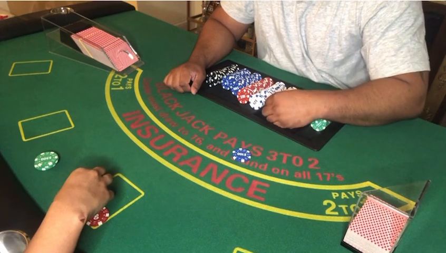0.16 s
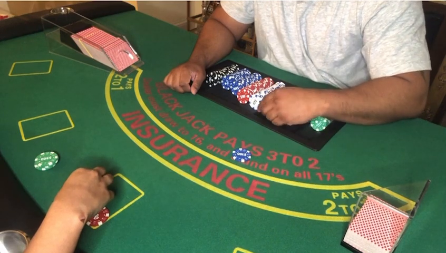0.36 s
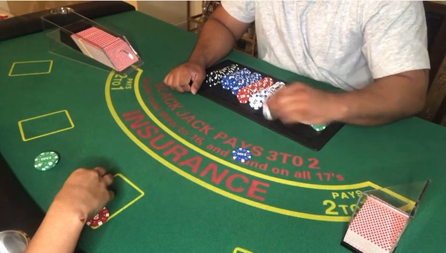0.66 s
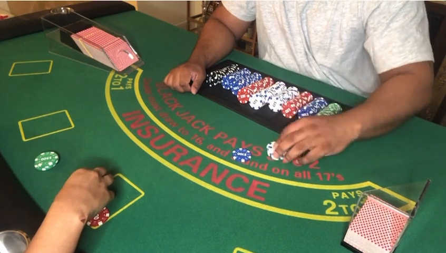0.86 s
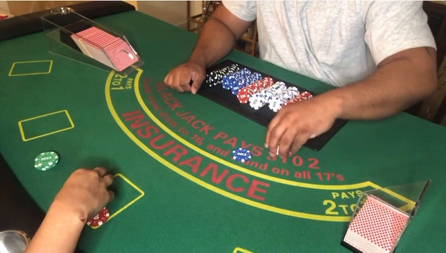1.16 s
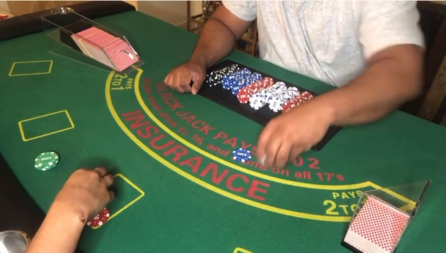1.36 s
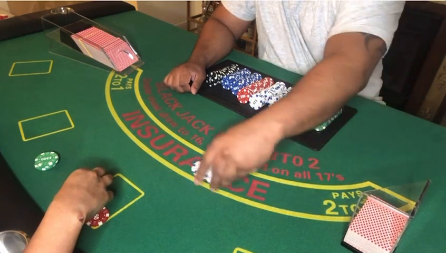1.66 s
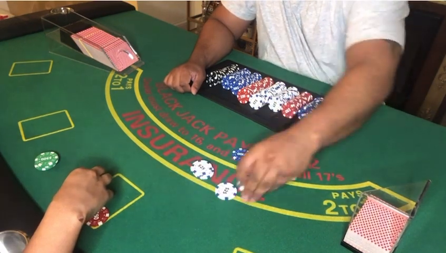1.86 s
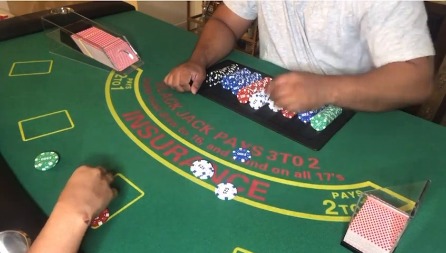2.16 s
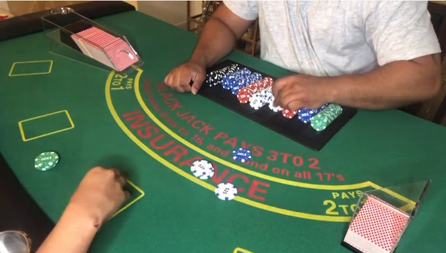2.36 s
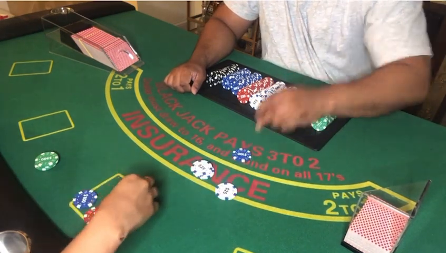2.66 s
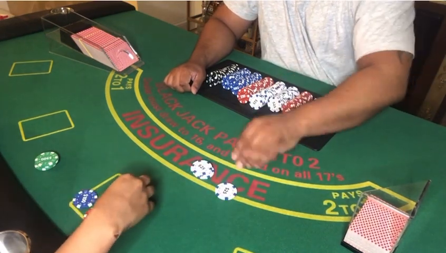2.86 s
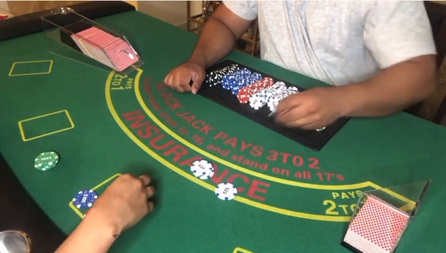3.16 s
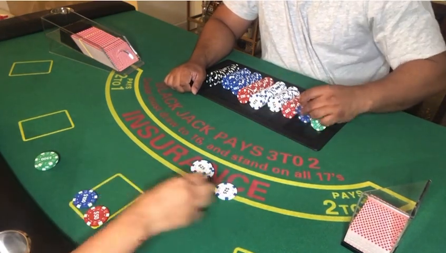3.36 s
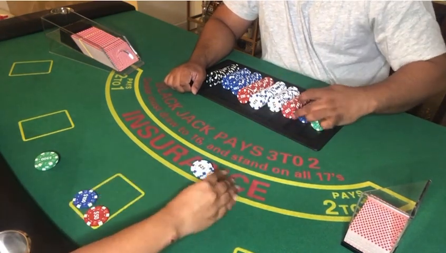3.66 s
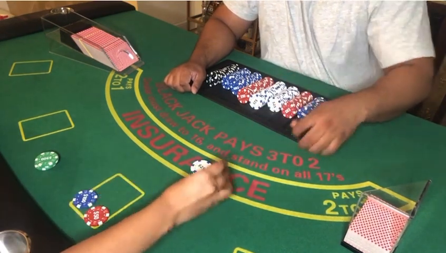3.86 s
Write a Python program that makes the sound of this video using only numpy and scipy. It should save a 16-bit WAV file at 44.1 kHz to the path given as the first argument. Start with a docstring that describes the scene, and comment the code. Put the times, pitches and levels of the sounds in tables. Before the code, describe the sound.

Plastic gambling chips click and clink sharply on a felt table in a quiet living room

```python
"""Loose plastic chips, struck together at a felt table in a quiet living room, crack and ring in their modes.
Stacked chips clack dully as short noise bursts; a plastic tray knocks as a sum of dying modes, and
fingertips tap it softly. The table top thuds in low modes, and hands slide over the cloth as lumpy noise.
The room adds a short tail to chips and tray, over a soft hum and a faint high whine."""
import sys
import numpy as np
from scipy import signal
from scipy.fft import rfft, irfft
from scipy.io import wavfile
from scipy.ndimage import uniform_filter1d

SR = 44100
rng = np.random.default_rng(int(sys.argv[2]) if len(sys.argv) > 2 else 0)


def wrap_up_sound(samples):
    """Save the sound to the file named by the first command line argument, as 16-bit audio."""
    columns = np.atleast_2d(samples).T
    # keep every value between -1 and 1, then stretch to whole-number steps
    tamed = np.clip(columns, -1, 1)
    steps = np.round(tamed * 32767).astype(np.int16)
    wavfile.write(sys.argv[1], SR, steps)


def gain_from_db(level_db):
    """Turn a decibel level (scalar or array-like) into a linear amplitude factor."""
    decades = np.asarray(level_db, float) / 20
    return 10 ** decades


N = 176400


def evened(x):
    """Normalisation: scales a signal to an rms of 1."""
    return x / np.sqrt(np.mean(x ** 2) + 1e-20)


def read(points, hz):
    """Interpolation on a log-frequency axis, on which hearing judges pitch."""
    f, value = np.transpose(points)
    return np.interp(np.log(hz + 1), np.log(f + 1), value)


def add(mix, s, peak_db, sound):
    """Superposition: adds a sound to the mix at its time and peak level."""
    part = mix[max(round(s * SR), 0):][:len(sound)]
    part += (gain_from_db(peak_db) * sound / np.abs(sound).max())[:len(part)]


def ring(hz, db, t60, length):
    """Modal synthesis: a struck body sounds as a sum of exponentially dying sines."""
    t = np.arange(0, length, 1 / SR)[:, None]
    level = gain_from_db(db - 60 * t / np.maximum(t60, 1e-3))
    return (level * np.sin(2 * np.pi * hz * t)).sum(1), t[:, 0]


def crack(noise, length, tilt_db, bump_hz=5000.):
    """Impact: a first contact, then a dying rattle of noise, in the colour of clashing plastic."""
    # Spectrum of clashing plastic. Each row: frequency in Hz, level in dB.
    plastic_colour = [(470, -40), (800, -6.5), (3340, -5), (5290, 1), (7660, -4), (11400, -7),
                      (12800, -12.5), (14100, -3.5), (16100, -19.5), (16900, -39.5)]
    bump_db, bump_octaves = 6, 0.56
    t = np.arange(len(noise)) / SR - .002
    hz = np.fft.rfftfreq(len(noise), 1 / SR)
    burst = noise * np.clip(t / 0.00009, 0, 1) * np.exp(-t / max(length, 2e-4))
    burst[94] = 2.01  # the first contact, against rattle noise of rms 1 before its decay
    bump = bump_db * np.exp(-(np.log2((hz + 1) / bump_hz) / bump_octaves) ** 2)
    tilt = tilt_db * np.log2(hz / 6000 + 0.46)
    burst = irfft(rfft(burst) * gain_from_db(read(plastic_colour, hz) + bump + tilt))
    burst = burst[74:]  # most of the silent lead is dropped
    burst = burst * np.minimum(np.arange(len(burst)) / 12, 1)
    return burst / np.abs(burst).max()


def shaped(db):
    """Short-time synthesis: random spectra weighted by db(hz, t) overlap into coloured noise."""
    frames = N // 128 + 5
    hz = np.fft.rfftfreq(512, 1 / SR)[:, None]
    a, b = rng.standard_normal((frames, 257, 2)).T
    spectra = (a + 1j * b) * gain_from_db(db(hz, np.arange(frames) * 128 / SR))
    return signal.istft(spectra, nperseg=512, noverlap=384)[1][:N]


def hush():
    """Room tone and hum: coloured noise, patchy in time and pitch, plus narrow-band noise tones."""
    # Spectrum of the room tone. Each row: frequency in Hz, relative level in dB per Hz.
    hush_colour = [(12, -54), (20, -17.5), (82, -3), (432, -10.5), (557, -15.5), (804, -16.5), (1300, -21),
                   (1410, -22), (2350, -32.5), (4620, -29.5), (13900, -39.5), (16900, -45)]
    # Fuzzy hum tones. Each row: frequency in Hz, width in Hz of each of two equal poles, rms level in dB.
    hum_tones = [(54.5, 30, -61), (146, 15, -70.5)]
    hush_db, patch_db = -62, 2
    frames, hz = N // 512 + 5, np.fft.rfftfreq(2048, 1 / SR)
    a, b, patch = rng.standard_normal((frames, 1025, 3)).T
    patch = uniform_filter1d(patch, size=16, axis=0)
    patch = evened(uniform_filter1d(patch, size=4, axis=1))
    spectra = (a + 1j * b) * gain_from_db(read(hush_colour, hz)[:, None] + patch_db * patch)
    out = gain_from_db(hush_db) * evened(signal.istft(spectra, nperseg=2048, noverlap=1536)[1][:N])
    for f_hz, width_hz, db in hum_tones:
        # slow complex noise carried up to the tone's frequency
        r = np.exp(-np.pi * width_hz / SR)
        slow = signal.lfilter([1], [1, -2 * r, r * r], rng.standard_normal((N, 2)) @ [1, 1j])
        out += gain_from_db(db) * evened((slow * np.exp(2j * np.pi * f_hz * np.arange(N) / SR)).real)
    return out


def whine():
    """Frequency modulation: a thin high sine whose pitch wavers slightly at random."""
    whine_hz, whine_db, waver_rms_hz = 4480, -77.5, 14
    waver = evened(uniform_filter1d(rng.standard_normal(N), size=2000))
    return gain_from_db(whine_db) * np.sin(2 * np.pi * np.cumsum(whine_hz + waver_rms_hz * waver) / SR)


def room(x):
    """Reverberation: first reflections, then three sparse tails fed in turn, bands dying at their own speed."""
    # Reverberation time. Each row: frequency in Hz, t60 in seconds.
    room_t60 = [(100, 0.36), (300, 0.31), (1000, 0.4), (3000, 0.49), (6000, 0.43), (10000, 0.34),
                (16000, 0.17)]
    # Colour of the tail at its start. Each row: frequency in Hz, relative level in dB.
    room_colour = [(100, 9), (1000, -0.6), (6000, -6.5), (16000, -6)]
    # First reflections. Each row: delay in seconds, level in dB.
    echoes = [(.0088, -15), (.0147, -18)]
    room_db, room_gap_s, room_rise_s, turn_hz = -7, 0.0027, 0.0065, 37
    out, t = np.zeros(N), np.arange(N) / SR
    for k in range(3):
        # one spike of random sign at a random place in every 12 samples
        spikes = np.zeros(SR)
        at = np.arange(100, SR - 12, 12) + rng.integers(0, 12, (SR - 101) // 12)
        spikes[at] = rng.choice([-1., 1.], len(at))
        hz, tt, z = signal.stft(spikes, SR, nperseg=512)
        z = z * gain_from_db(read(room_colour, hz)[:, None] - 60 * tt / read(room_t60, hz)[:, None])
        tail = signal.istft(z, SR, nperseg=512)[1][:SR]
        tail = tail * np.clip((t[:SR] - room_gap_s) / room_rise_s, 0, 1)
        # the three feeds are a sixth of a cycle apart, so their squares sum to 1
        turn = np.cos(2 * np.pi * (turn_hz * t + k / 6)) * np.sqrt(2 / 3)
        out += gain_from_db(room_db) * signal.fftconvolve(x * turn, tail / np.linalg.norm(tail))[:N]
    for s, db in echoes:
        delay = round(s * SR)
        out[delay:] += gain_from_db(db) * x[:-delay]
    return out


def slides():
    """Friction: hands and chips rub the felt as lumpy noise with fibre ticks; body and treble swell apart."""
    # Five slides, each a list. Each row: time in seconds, body level in dB, treble level in dB.
    slide_curves = [
        [(0.0, -68.5, -103), (0.158, -66, -92), (0.216, -54, -76.5), (0.352, -68.5, -80), (0.36, -59.5, -91),
         (0.5, -63.5, -72.5), (0.7, -62, -63.5), (0.82, -60, -75)],
        [(0.85, -67, -88), (1.02, -61.5, -64.5), (1.045, -59, -62), (1.1, -72, -73), (1.122, -51.5, -63.5),
         (1.324, -81.5, -96), (1.48, -57.5, -58.5)],
        [(1.72, -57.5, -83), (1.784, -63, -73), (1.926, -63, -71.5), (1.948, -75, -92.5), (2.146, -86.5, -82),
         (2.168, -70.5, -106), (2.22, -82, -102)],
        [(2.66, -95.5, -102), (2.686, -76.5, -80.5), (2.776, -55.5, -62), (2.954, -56.5, -59.5),
         (3.04, -74, -78), (3.206, -89, -99), (3.29, -59, -63.5)],
        [(3.7, -55, -67), (3.728, -85, -75), (3.768, -63, -79.5), (3.792, -92, -79), (3.798, -71.5, -77),
         (3.916, -61.5, -68), (3.93, -61, -66)],
    ]
    # Spectrum of rubbed felt. Each row: frequency in Hz, relative level in dB per Hz.
    rub_colour = [(59, -41.5), (100, -32), (141, -13), (412, 5), (479, -2.5), (736, -3), (5900, -8),
                  (15200, -29.5), (16900, -49.5)]
    split_hz, fade_s = 2640, 0.06
    grain_db, lump_db = 2, 3.5  # flicker from frame to frame; uneven catching of the cloth
    fibres_per_s, fibre_db, fibre_spread_db = 500, -9, 3.5
    t, out = np.arange(N) / SR, np.zeros(N)

    def colour(hz, tt):
        """Stick and slip: the rub spectrum with random flicker, swells and patches."""
        swell = evened(uniform_filter1d(rng.standard_normal(len(tt)), size=8))
        patch = rng.standard_normal((len(tt), len(hz))).T
        patch = uniform_filter1d(patch, size=5, axis=0)
        patch = evened(uniform_filter1d(patch, size=10, axis=1))
        grain = grain_db * rng.standard_normal(len(tt))
        return read(rub_colour, hz) + grain + lump_db * (swell + patch) / 2

    rub = evened(shaped(colour))
    fibre_height = gain_from_db(fibre_spread_db * np.minimum(rng.exponential(1, N), 5))
    fibre_hit = rng.random(N) < fibres_per_s / SR
    fibres = fibre_height * fibre_hit * rng.choice([-1, 1], N)
    fibre_band = signal.butter(1, (1500, 7000), "band", fs=SR, output="sos")
    rub = rub + gain_from_db(fibre_db) * evened(signal.sosfilt(fibre_band, fibres))
    low = signal.sosfiltfilt(signal.butter(2, split_hz, fs=SR, output="sos"), rub)
    body, treble = evened(low), evened(rub - low)
    for rows in slide_curves:
        s, body_db, treble_db = np.transpose(rows)
        fade = np.clip(np.minimum(t - s[0], s[-1] - t) / fade_s + .5, 0, 1)
        out += fade * gain_from_db(np.interp(t, s, body_db)) * body
        out += fade * gain_from_db(np.interp(t, s, treble_db)) * treble
    return out


def table():
    """Dispersion: bending waves travel faster at high pitch, so each table-top thud glides down."""
    # Thuds. Each row: time in seconds, peak level in dB, extra level of the upper modes in dB.
    thuds = [(0.039, -45.5, 11), (0.213, -40.5, 9.5), (0.26, -46, 17), (0.368, -46.5, 42), (0.624, -52, 7),
             (0.715, -30, -4), (0.73, -35.5, -8), (0.75, -33, -4.5), (0.799, -42.5, -8), (0.824, -42, -15),
             (1.036, -49.5, -13), (1.129, -48, 8), (1.51, -33.5, -12.5), (1.675, -33.5, 2.5),
             (1.744, -36.5, -1), (1.868, -44.5, -8), (2.15, -49, 9), (2.905, -52.5, -12),
             (3.323, -46.5, 33), (3.37, -39, 3.5), (3.955, -32.5, -12)]
    # Modes of the table top. Each row: frequency in Hz, level in dB, t60 in seconds,
    # share (0 to 1) of the extra upper-mode level that the mode takes.
    table_modes = [(65, -10.5, 0.33, 0.3), (101.6, -0.5, 0.14, 0.13), (141.5, 0.5, 0.36, 0.17),
                   (182.5, -3.5, 0.12, 0.53), (212, -9.5, 0.13, 0.16), (252.6, -4, 0.13, 0.92),
                   (316.4, -3, 0.14, 1), (356, -3.5, 0.061, 1), (450, -6.5, 0.06, 0.83),
                   (563, -7, .035, 0.34), (710, -15, .025, .5)]
    rise_s, lag_s = .008, .012  # both at 100 Hz, shorter for higher modes
    out, (hz, db, t60, upper) = np.zeros(N), np.transpose(table_modes)
    slowness = np.sqrt(100 / hz)
    lag = lag_s * slowness
    t = np.arange(0, .5, 1 / SR)[:, None] - lag + lag.min()
    rise = np.clip(t / (rise_s * slowness), 0, 1)
    for (s, peak_db, upper_db), phase in zip(thuds, rng.random((len(thuds), len(hz)))):
        level = rise * gain_from_db(db + upper_db * upper - 60 * t / t60)
        tone = level * np.sin(2 * np.pi * (hz * t + phase))
        add(out, s - rise_s, peak_db, tone.sum(1))
    return out


def taps():
    """Soft excitation: fingertips on the tray wake only one hollow note and a weak overtone."""
    # Taps. Each row: start in seconds, peak level in dB, frequency in Hz, t60 in seconds.
    tap_rows = [(.214, -45, 823, 0.11), (0.233, -50, 906, 0.081), (.361, -37.5, 817, 0.018),
                (.378, -48, 815, 0.032), (.412, -44, 894, 0.026), (.965, -48.5, 795, 0.042),
                (1.123, -43, 548, 0.042), (1.134, -48.5, 910, 0.05), (1.662, -44.5, 905, 0.015),
                (1.863, -50.5, 592, 0.025), (2.761, -49.5, 1045, 0.0504), (3.372, -35, 813, 0.085),
                (2.298, -37.5, 310, 0.087), (2.93, -49, 900, 0.08), (2.861, -52, 490, 0.085),
                (.27, -46, 347, .05)]
    overtone_ratio, overtone_db, rise_s = 1.6, -11.5, .003
    out = np.zeros(N)
    for s, peak_db, hz, t60 in tap_rows:
        tone, t = ring(hz * np.array([1, overtone_ratio]), np.array([0, overtone_db]), t60, 0.15)
        add(out, s, peak_db, tone * np.minimum(t / rise_s, 1))
    return out


def tray():
    """Modal resonance: hollow plastic modes swell to aligned crests, then die; each knock has a small tick."""
    # Knocks. Each row: time in seconds, peak level in dB before the band filter, factor on the mode
    # frequencies, factor on the ring times, tilt in dB per octave.
    knocks = [(2.3003, -3.5, 1.002, 0.8, 2), (2.3424, -11, 1.04, 0.8, 0), (3.3551, -21.5, 1.17, 0.73, 3),
              (3.5243, -17, 1.02, 1.08, 3)]
    # Modes of the tray. Each row: frequency in Hz, level in dB, t60 in seconds.
    tray_modes = [(345.5, -17, 0.04), (680, -13, 0.021), (824, -1.5, 0.015), (1069, -3.5, 0.017),
                  (1330, -3.5, 0.011), (1564, -5.5, 0.01), (1815, -10, 0.008), (2406, -13, 0.0095),
                  (2900, -16, 0.006), (3520, -17.5, 0.0063)]
    rise_s, tick_db, tick_s, band_hz = 0.0022, -8.5, 0.00031, (260, 6000)
    lag_s = 0.000577  # modes crest this much later per octave down, relative to 1 kHz
    out, (hz, db, t60) = np.zeros(N), np.transpose(tray_modes)
    t = np.arange(-2 * rise_s, .15, 1 / SR)[:, None] + lag_s * np.log2(hz / 1000)
    swell = np.clip(1 + t / rise_s, 0, 1) ** 2
    for (s, peak_db, pitch, long, tilt_db), noise in zip(knocks, rng.standard_normal((len(knocks), 1024))):
        decay_db = 60 * np.maximum(t, 0) / (t60 * long)
        level = swell * gain_from_db(db + tilt_db * np.log2(hz / 800) - decay_db)
        tone = -(level * np.cos(2 * np.pi * hz * pitch * t)).sum(1)
        add(out, s - 2 * rise_s, peak_db, tone)
        # brighter knocks tick louder
        tick = crack(noise, tick_s, -9.0, 3800.)
        add(out, s - rise_s / 2, peak_db + tick_db + 2 * tilt_db, tick)
    return signal.sosfilt(signal.butter(2, band_hz, "band", fs=SR, output="sos"), out)


def stacked_chips():
    """Damping: chips in a stack clack as a short crack without ringing."""
    # Clacks. Each row: start in seconds, peak level in dB, rattle decay time in seconds (at least 0.2 ms
    # is used), tilt in dB per octave, centre of the spectral bump in Hz.
    clacks = [(0.199, -47.5, 0.002, -9, 4100), (0.418, -44, 0.0078, -19.5, 4130),
              (0.7088, -29, 0.0047, 0.5, 5760), (0.7103, -26.5, 0.0024, -6, 4660),
              (0.7262, -29.5, 0.0057, -9, 5000), (0.7448, -22, 0.00074, -2.5, 5030),
              (1.033, -28.5, 0.0011, -2.5, 4040), (1.53, -15.5, 0.00044, 5, 8100),
              (2.247, -19, 0.001, -7.5, 3330), (2.316, -25.5, 0.00075, -7, 8900),
              (2.317, -13.5, 0.0024, -7.5, 5370), (2.3357, -29.5, 0.0013, -0.5, 11000),
              (2.3384, -26, .0015, -3.5, 13900), (2.3406, -13.5, 0.00071, -14, 3050),
              (2.69, -55, .002, 4, 9870), (3.3192, -20.5, 0.0011, -10.5, 3020),
              (3.3645, -11, 0.0011, 21, 6000), (3.366, -6.5, 0.0012, 9.5, 5450),
              (3.3686, -8, 0.00035, -11.5, 10600), (3.9493, -6.5, 0.00051, 20, 10400)]
    out = np.zeros(N)
    for (s, peak_db, length, tilt_db, bump_hz), noise in zip(clacks, rng.standard_normal((len(clacks), 1024))):
        add(out, s, peak_db, crack(noise, length, tilt_db, bump_hz))
    return out


def loose_chips():
    """Free vibration: two loose chips crack together and both ring in slightly different modes."""
    # Clinks. Each row: start in seconds, peak level in dB, ring t60 in seconds, tilt in dB per octave,
    # crack level against the ring in dB, extra level of the main mode in dB.
    clinks = [(1.034, -28.5, 0.013, -17, 0, 3.5), (1.4955, -31.5, 0.1, -16, -0.5, 0.5),
              (1.5156, -10, 0.12, 3.5, -1.5, -8), (1.519, -16, 0.068, 24, 1.5, 5.5),
              (1.5277, -9, .035, 17, -7.5, 4.3), (1.530, -17.5, 0.027, 4, 0, -3),
              (1.916, -42, 0.036, 15, -8.5, 0), (3.3183, -30, 0.049, -9, 3.5, -1),
              (3.9275, -55, 0.022, 2, -19, 15), (3.932, -51, 0.023, 11, -7, 0.1),
              (3.9434, -12.5, 0.057, -8.5, 4, 10), (3.9499, -8, 0.0153, -2, -11, 26),
              (3.9537, -12.5, 0.023, -1, 11, 11), (3.956, -17.5, 0.054, -22, -10, 0),
              (3.9606, -16, 0.033, 2.5, 7, -3), (3.9634, -17, 0.038, 24, 3, -8),
              (3.967, -16.5, 0.07, 23, 3.5, 7)]
    # Modes of one chip, in order of pitch. Each row: level in dB, factor on the ring time.
    chip_modes = [(-6, 1.7), (4.5, 0.54), (-20.5, 1.3), (8, 2.7), (-17, .4), (2, 0.68), (1, .8),
                  (-18.5, 0.25), (-16, 0.4), (-14.5, 0.46), (-3.5, .9), (-3, .7), (-13, .6)]
    # Mode frequencies of one chip, in Hz, in the same order.
    chip_hz = [4100, 5650, 6000, 6500, 7900, 8520, 9150, 10600, 11300, 12300, 13650, 14750, 15400]
    detune, strike_db = .013, 2.5  # random spreads: share of frequency, mode level
    hz, (db, share) = np.array(chip_hz + chip_hz), np.transpose(chip_modes + chip_modes)
    out, k = np.zeros(N), len(hz)
    main = (hz > 6300) & (hz < 6900)
    draws = rng.standard_normal((len(clinks), 1024))
    for (s, peak_db, t60, tilt_db, crack_db, main_db), noise in zip(clinks, draws):
        mode_hz = hz * (1 + detune * noise[k:2 * k])
        mode_db = db + main_db * main + strike_db * noise[:k] + tilt_db * np.log2(hz / 6500)
        tone = ring(mode_hz, mode_db, t60 * share, .2)[0]
        tone /= np.abs(tone).max()
        tick = gain_from_db(crack_db) * crack(noise, 0.0015, 2.5)
        tone[:len(tick)] += tick
        add(out, s, peak_db, tone)
    return out


def scene():
    """Superposition of all sources; chips, tray and taps also excite the room."""
    bright, hollow = loose_chips() + stacked_chips(), tray() + taps()
    tray_send_db = -2.5  # the tray feeds the room less than the chips do
    wet = room(bright + gain_from_db(tray_send_db) * hollow)
    return (bright + hollow + wet + table() + slides() + hush() + whine())[None]


def top_cut(x):
    """Nothing passes above the cut-off."""
    return signal.sosfilt(signal.butter(12, 17050, fs=SR, output="sos"), x)


def record(dry):
    """Linear filtering: a bass cut and a band limit on the finished mix."""
    bass_cut_hz, edge_hz = 88.5, 16100
    x = signal.sosfilt(signal.butter(2, bass_cut_hz, "high", fs=SR, output="sos"), dry)
    band_limit = signal.firwin(127, edge_hz, window=("kaiser", 6), fs=SR)
    x = signal.oaconvolve(x, band_limit[None], "same")
    return top_cut(x)


dry = scene()
out = record(dry)
wrap_up_sound(out)
```